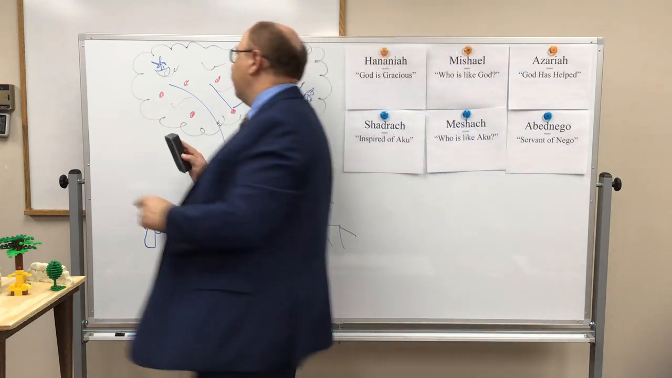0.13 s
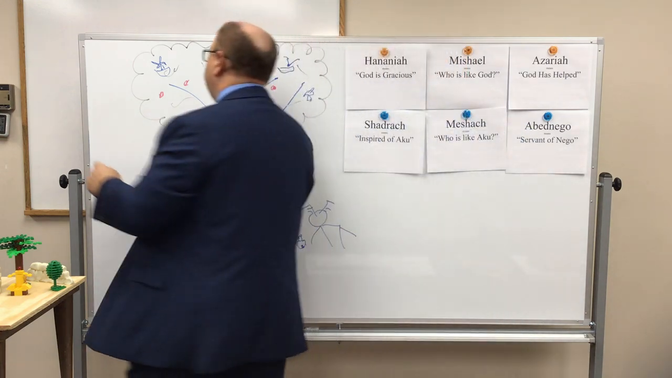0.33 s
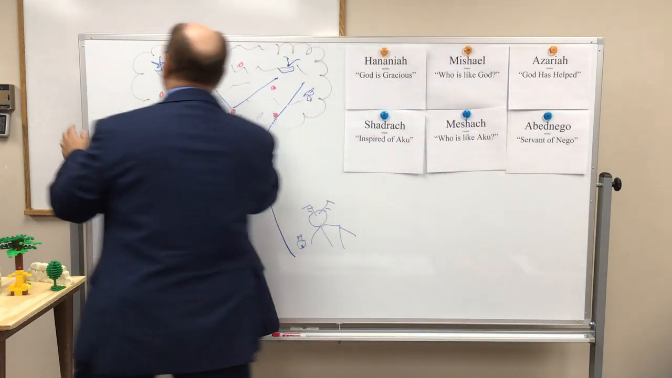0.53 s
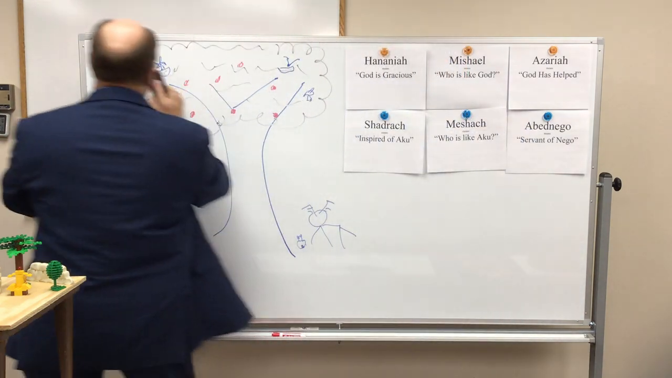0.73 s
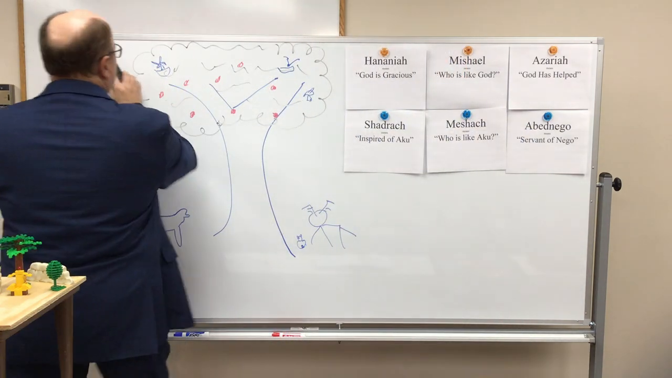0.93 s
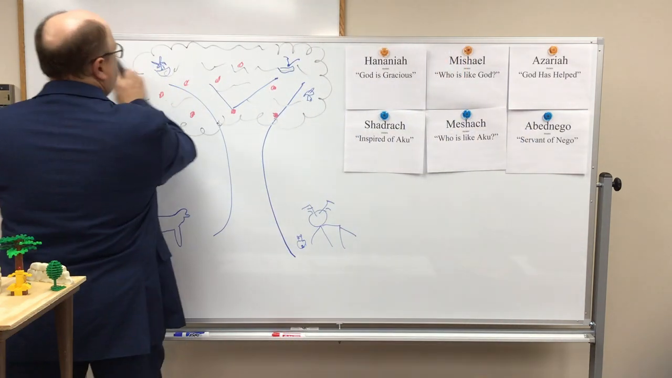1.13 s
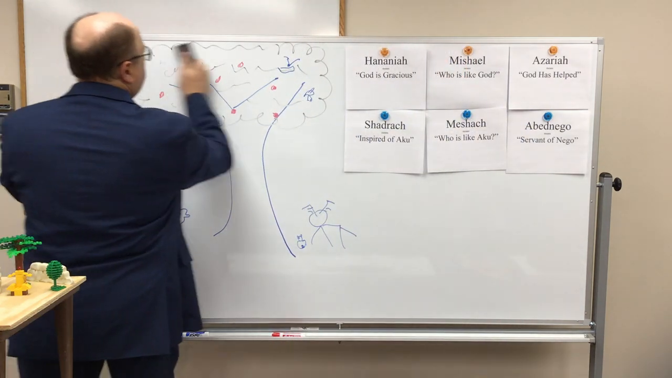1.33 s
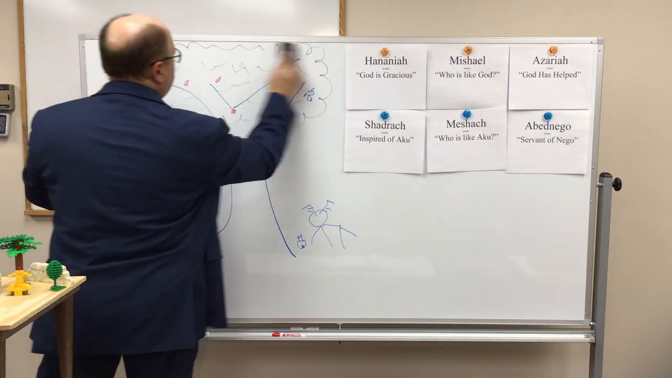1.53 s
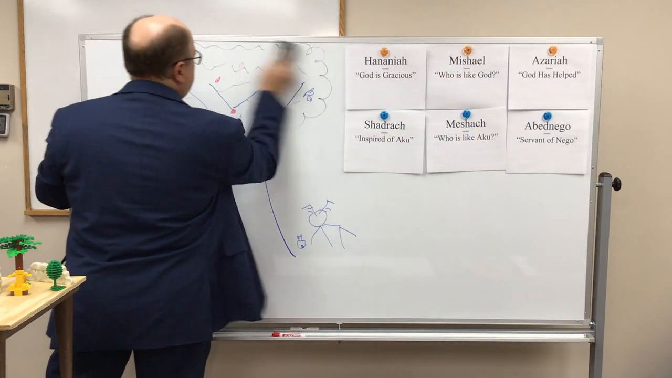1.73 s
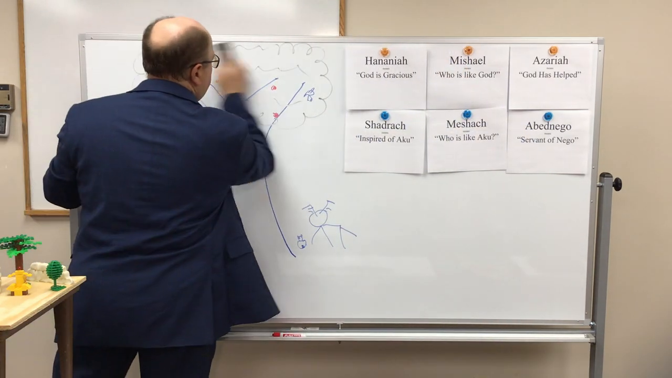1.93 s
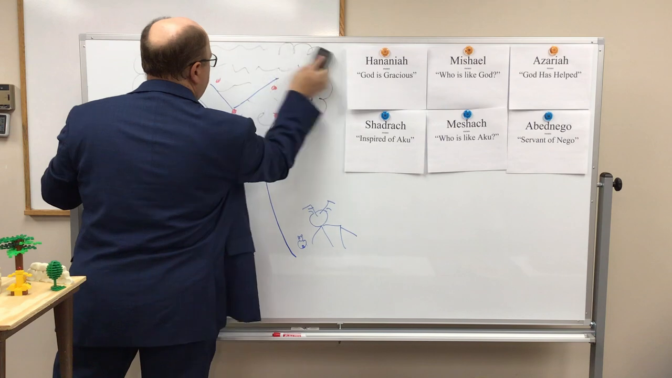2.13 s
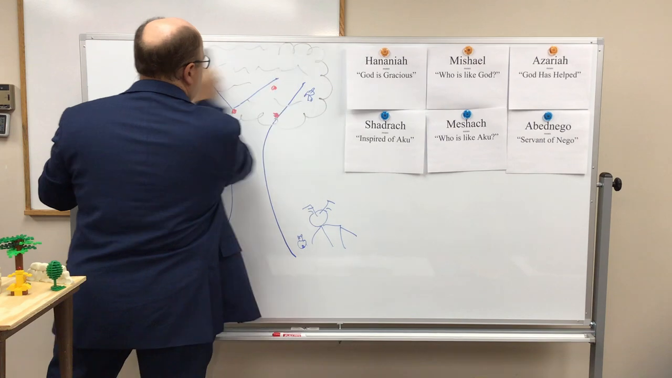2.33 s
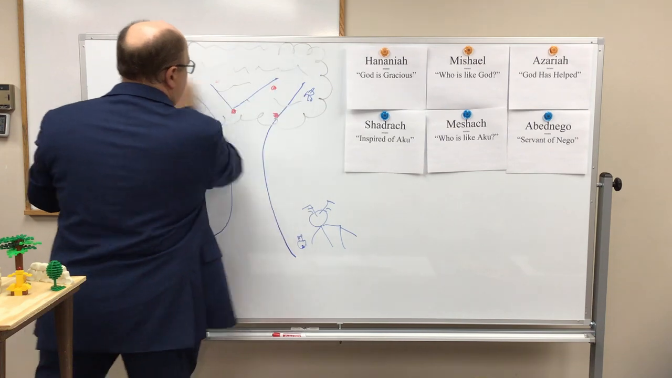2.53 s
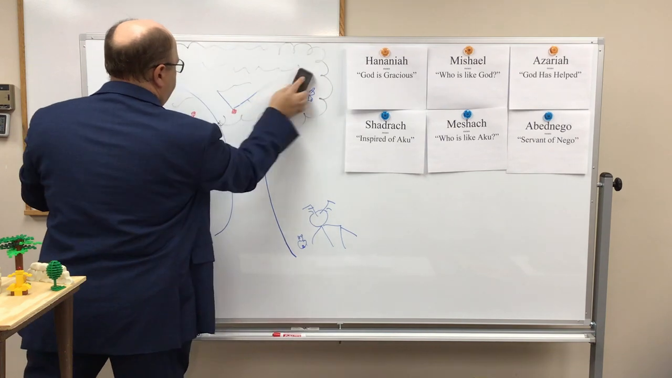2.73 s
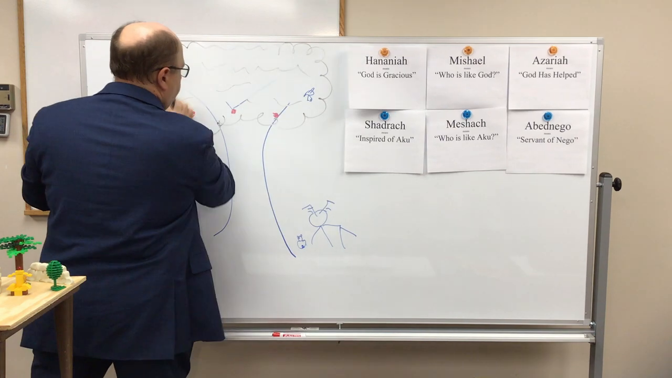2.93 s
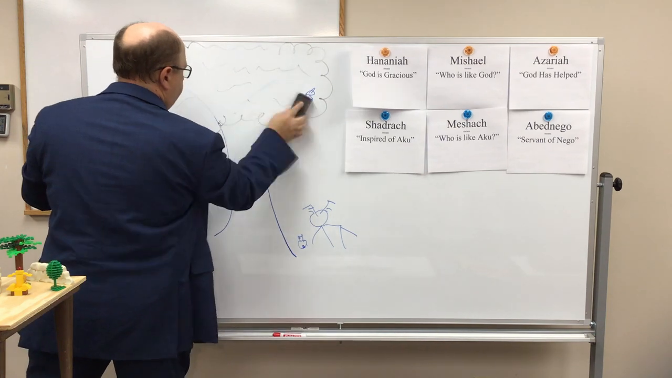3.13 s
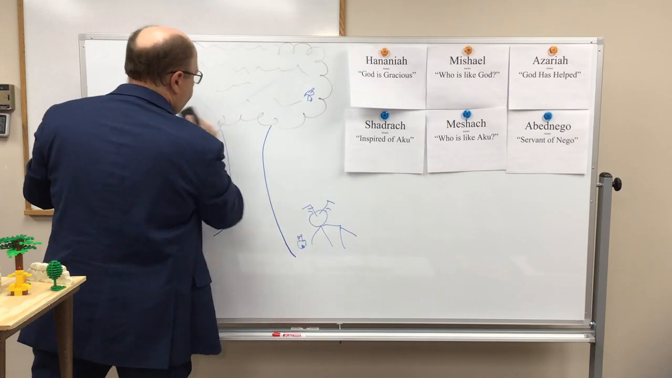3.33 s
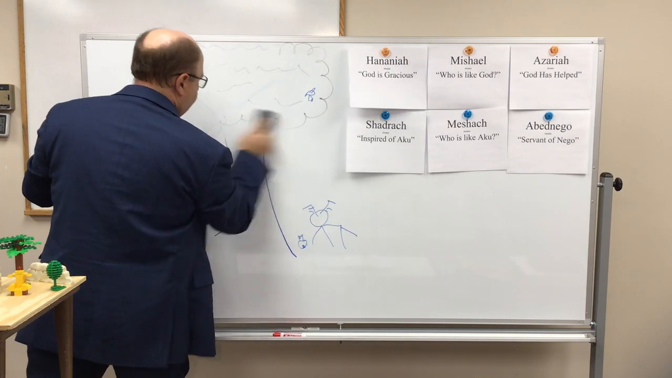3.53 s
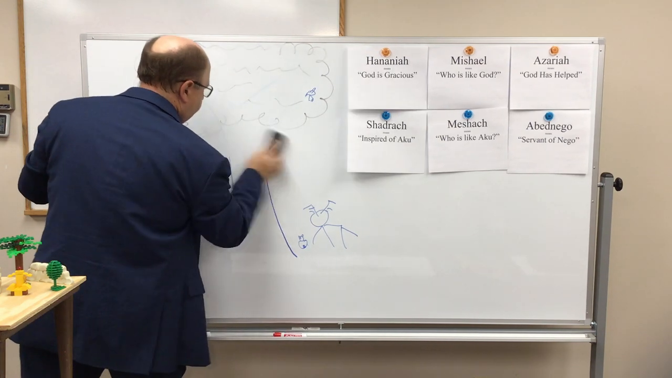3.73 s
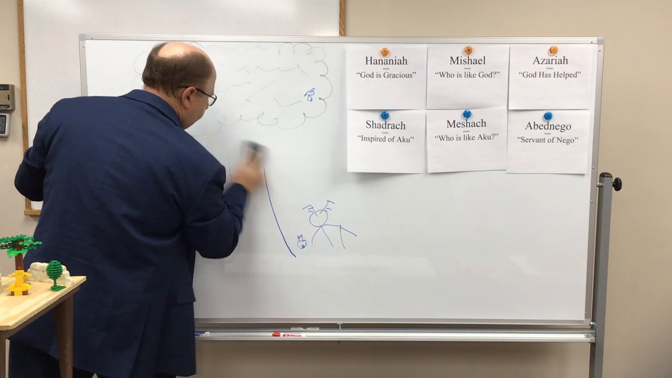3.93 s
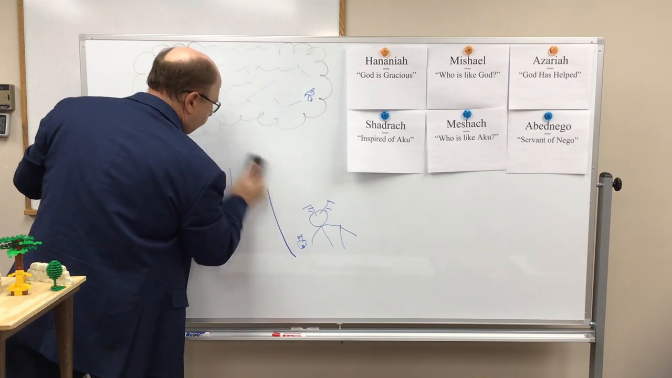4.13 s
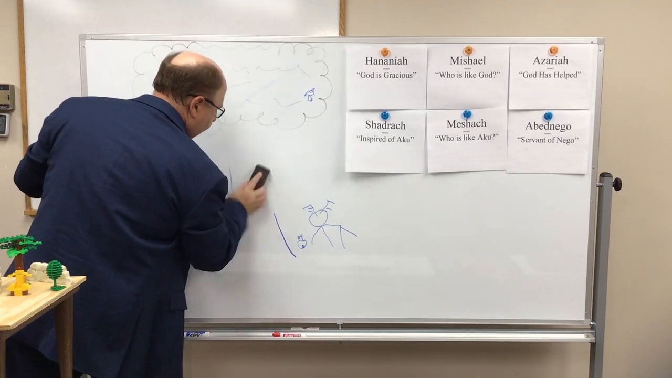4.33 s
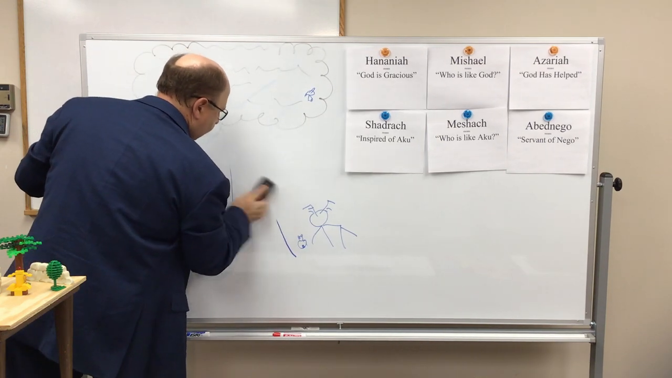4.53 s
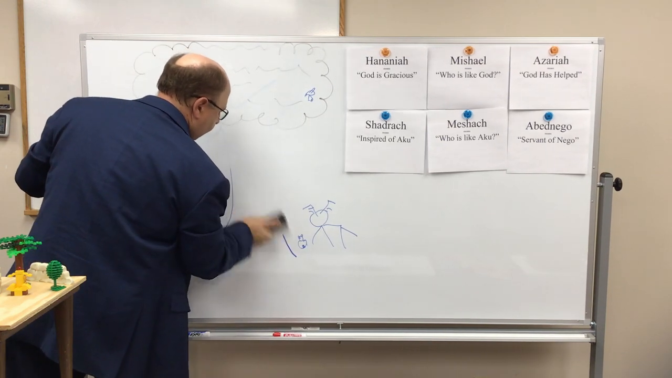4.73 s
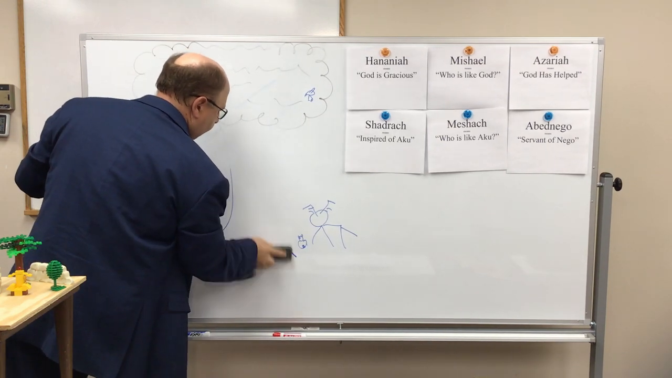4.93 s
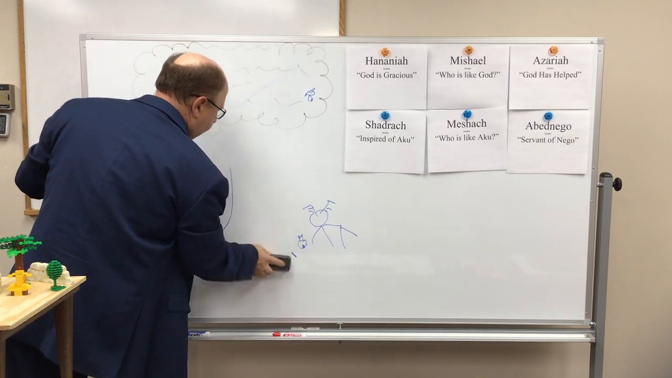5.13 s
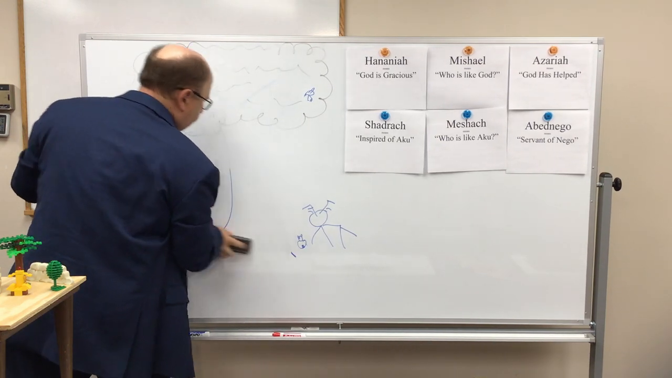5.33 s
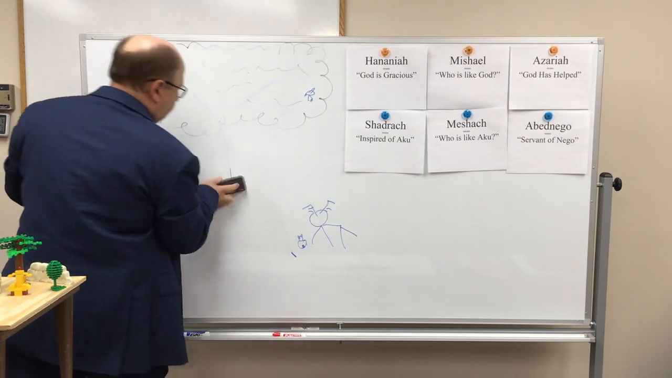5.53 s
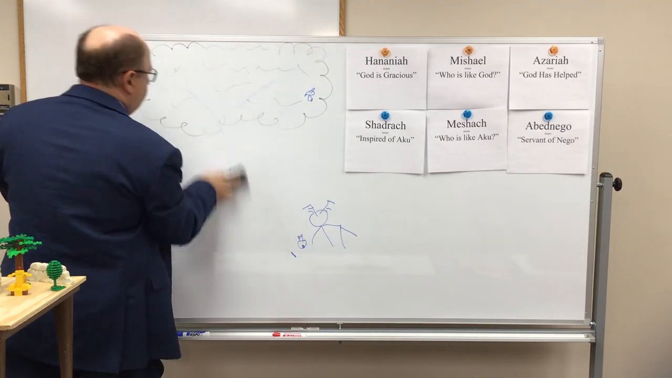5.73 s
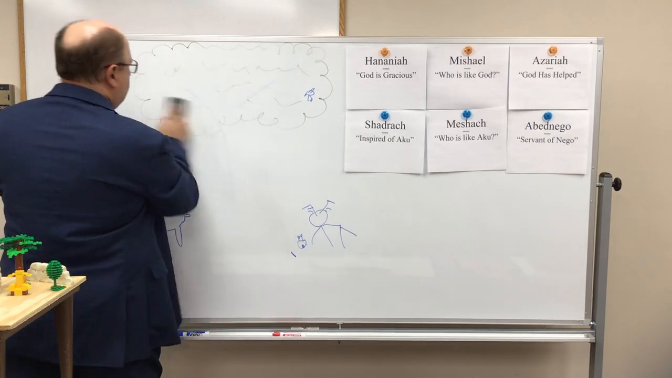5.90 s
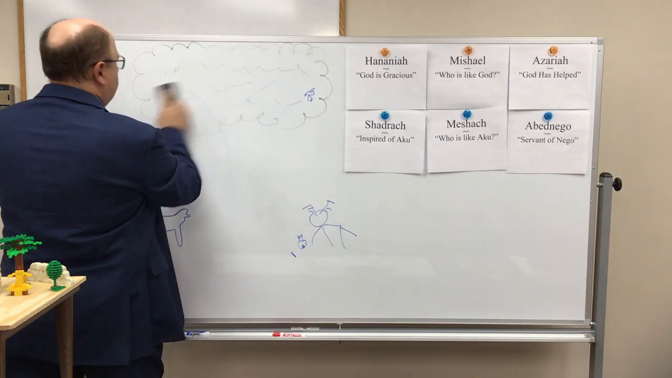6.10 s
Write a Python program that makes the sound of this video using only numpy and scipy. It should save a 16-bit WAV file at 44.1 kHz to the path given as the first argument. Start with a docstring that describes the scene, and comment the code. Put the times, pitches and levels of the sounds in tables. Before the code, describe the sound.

A jacket rustles and a hand knocks once against a whiteboard's frame. Then a felt eraser rubs back and forth in quick, uneven strokes, hissing and scraping while the panel gives hollow thumps and a low rumble. Plastic clacks and a few tiny squeaks break through. It is heard from a few metres away in a classroom with soft, steady ventilation.

```python
"""Erasing a whiteboard

A felt eraser scrubs a free-standing whiteboard in quick, uneven strokes, a few metres off in a classroom.
The felt hisses as it slides and drags on the panel, which thumps as the hand lands and turns;
hard contacts clack and squeak. First a jacket rustles and a hand grabs the frame.
The room answers over steady ventilation."""
import sys
import numpy as np
from scipy import signal
from scipy.fft import rfft, irfft, next_fast_len
from scipy.io import wavfile
from scipy.ndimage import uniform_filter1d, map_coordinates

SR = 44100
rng = np.random.default_rng(int(sys.argv[2]) if len(sys.argv) > 2 else 0)


def wrap_up_sound(samples):
    """Save the sound to the file named by the first command line argument, as 16-bit audio."""
    columns = np.atleast_2d(samples).T
    # keep every value between -1 and 1, then stretch to whole-number steps
    tamed = np.clip(columns, -1, 1)
    steps = np.round(tamed * 32767).astype(np.int16)
    wavfile.write(sys.argv[1], SR, steps)


N = 276242


def amp(db):
    """Decibels to gain."""
    return 10 ** (np.asarray(db) / 20)


def unit(x):
    """x at rms 1."""
    return x / np.sqrt(np.mean(x ** 2) + 1e-20)


def along(points, hz):
    """(Hz, value) points joined on a log frequency axis."""
    knots_hz, values = np.transpose(points)
    return np.interp(np.log(hz + 1), np.log(knots_hz + 1), values)


def wobble(rate):
    """A smooth random curve, rate knots a second."""
    knots = rng.standard_normal(int(N * rate / SR) + 4)
    return map_coordinates(knots, [np.arange(N) * rate / SR])


def filtered(x, response):
    """x through an EQ given as gain against Hz."""
    n = x.shape[-1]
    padded = next_fast_len(n + 8192)
    hz = np.fft.rfftfreq(padded, 1 / SR)
    return irfft(rfft(x, padded) * response(hz), padded)[..., :n]


def add(track, start_s, sound):
    """Mix a sound into the track at start_s."""
    start = max(round(start_s * SR), 0)
    part = track[..., start:start + sound.shape[-1]]
    part += sound[..., :part.shape[-1]]


# Stereo image of the room. Each row: frequency in Hz, left-right correlation.
STEREO_LIKENESS = [(100, .995), (300, .99), (600, .93), (2000, .95), (4000, .96), (7500, .82), (10500, .87),
                   (13000, .995)]
def diffuse(pair):
    """Blend two unrelated signals into a diffuse field, heard at two close points."""
    angle = lambda hz: np.arccos(np.clip(along(STEREO_LIKENESS, hz), -1, 1)) / 2
    mid, side = filtered(pair, lambda hz: np.array([np.cos(angle(hz)), np.sin(angle(hz))]))
    return np.array([mid + side, mid - side])


def noise(spectrum, grain=1):
    """Stereo noise of rms 1, roughened by a grain envelope, then coloured by (Hz, dB) points."""
    rough = grain * rng.standard_normal((2, N))
    return unit(diffuse(filtered(rough, lambda hz: amp(along(spectrum, hz)))))


# The classroom's reverb. Each row: frequency in Hz, time to fall 60 dB in seconds.
ROOM_DECAY = [(100, 0.44), (300, 0.27), (1000, 0.34), (4000, 0.24), (12000, 0.099)]
def room(x, predelay_s=.014):
    """The classroom answers from walls a few steps away; each frequency dies at its own speed."""
    hz, t, bands = signal.stft(rng.standard_normal((2, SR // 2)), SR, nperseg=256)
    decay = amp(-60 * t / along(ROOM_DECAY, hz)[:, None])
    tail = signal.istft(bands * decay, SR, nperseg=256)[1]
    tail = np.pad(diffuse(tail), ((0, 0), (round(predelay_s * SR), 0)))
    tail /= np.linalg.norm(tail[0])
    return signal.fftconvolve(np.atleast_2d(x), tail, axes=1)[:, :x.shape[-1]]


# Colour of the room tone. Each row: frequency in Hz, relative level in dB.
VENT_SPECTRUM = [(15, -55), (25, -16.5), (110, -2.5), (253, -6.5), (289, 0), (378, -12), (410, -7),
                 (482, -10.5), (919, -13.5), (1570, -13.5), (2230, -15), (3440, -17.5), (4040, -20),
                 (15500, -26.5)]
def ventilation():
    """Moving air lays a steady bed under the scene."""
    return amp(-61.0) * noise(VENT_SPECTRUM)


# Fader ride of the jacket on the way to the board. Each row: time in seconds, level in dB.
SLEEVE_LEVELS = [(0, -62), (.3, -64), (.45, -64.5), (.62, -60.5), (.8, -58.5), (.95, -62.5), (1.01, -57.5),
                 (1.13, -65), (1.2, -100)]
def sleeve():
    """Cloth brushes on cloth as the arm comes up."""
    times, levels = np.transpose(SLEEVE_LEVELS)
    level_db = np.interp(np.arange(N) / SR, times, levels)
    cloth = [(300, -22), (600, 3), (2200, -2), (5000, -2.5), (8000, -8), (15000, -17)]
    return amp(level_db - 2) * noise(cloth, grain=amp(1.8 * wobble(700)))


# The frame's ring. Each row: pitch in Hz, relative level in dB, time to fall 60 dB in seconds.
FRAME_MODES = [(166, 2, 0.15), (223, -2.5, 0.13), (322, 0.5, 0.086), (393, -14, 0.081), (505, -2.5, 0.099),
               (690, -12.5, 0.06), (1000, -19, .06)]
def grab(start_s=.630, level_db=-41.5, rise_s=0.00085):
    """The free hand takes hold of the board's edge and knocks the frame once."""
    out, t = np.zeros((2, N)), np.arange(SR // 2) / SR
    ring = sum(amp(db - 60 * t / t60) * np.sin(2 * np.pi * (hz * t + rng.random()))
               for hz, db, t60 in FRAME_MODES)
    knock = amp(level_db) * ring * (1 - np.exp(-t / rise_s))
    add(out, start_s, knock + amp(-7) * room(knock))
    return out


# Raspy chirps, and the bright snap on top of one late clack.
# Each row: start and length in seconds, level in dB, first and last pitch in Hz.
CHIRP_GLIDES = [(2.875, 0.019, -51, 2345, 1546), (3.266, 0.037, -53, 11000, 7000),
                (3.281, 0.043, -48.5, 7100, 5340), (3.298, 0.0253, -45.5, 2165, 1670),
                (3.626, 0.029, -50, 2360, 2140), (4.171, 0.014, -45, 1263, 1990),
                (4.177, 0.031, -44, 2390, 2004), (5.993, 0.0122, -47.5, 9500, 7540)]
def chirps(rasp=0.16):
    """Ragged glides: squeaks as the eraser's edge sticks and slips; the last is a clack's snap."""
    out = np.zeros(N)
    for start_s, length_s, db, first_hz, last_hz in CHIRP_GLIDES:
        progress = np.linspace(0, 1, round(length_s * SR))
        glide_hz = first_hz * (last_hz / first_hz) ** progress
        hz = glide_hz * (1 + rasp * wobble(1500)[:len(progress)])
        envelope = np.minimum(progress / 0.2, 1) * np.sqrt(1 - progress)
        add(out, start_s, amp(db + 1.5) * envelope * np.sin(2 * np.pi * np.cumsum(hz) / SR))
    return out + amp(-7) * room(out)


# Colour of a clack. Each row: frequency in Hz, relative level in dB.
SHELL_SPECTRUM = [(90, -30), (250, 5.5), (450, -4), (800, -3.5), (1400, -4.5), (2100, 0), (2900, -2.5),
                  (3500, -0.5), (3850, 0.5), (4400, -3), (5300, -10), (6100, -13.5), (9000, -27),
                  (16000, -43)]
# Hard contacts. Each row: start in seconds, level in dB, hollowness in dB, brightness in dB.
CLACK_HITS = [(0.776, -66, 2, 12.5), (1.787, -56, 5, -9), (2.262, -61, 11.5, -1), (2.478, -43, 2.5, 4.5),
              (2.879, -49, -8.5, -8), (3.293, -48.5, -8, -5), (3.452, -53.5, 5.5, 2),
              (3.475, -43, -6.5, -16), (3.787, -48, 1, 4), (3.914, -49.5, 1, -1.5), (4.066, -54, 0, 6),
              (4.289, -52, -12, 1.5), (4.396, -58, 1, 4.5), (4.519, -62, 4, -10), (4.629, -63.5, 6.5, -2),
              (5.566, -59, 3, -8), (5.913, -44.5, 5.5, 1.5), (5.934, -44, 9, -4.5), (5.993, -40.5, -4, -3),
              (6.029, -43.5, 4, -9.5), (6.163, -52.5, 6, 3)]
def clacks(t60_s=0.14, rise_s=0.003):
    """The plastic shell and the panel in its frame chatter: a dense burst of tiny contacts."""
    out, t = np.zeros((2, N)), np.arange(SR // 4) / SR
    for start_s, db, hollow_db, bright_db in CLACK_HITS:
        tint = [(900, hollow_db + 4.0), (2100, 0), (4200, bright_db - 0.5)]
        chatter = noise(SHELL_SPECTRUM, grain=amp(1.57 * wobble(281)))[:, :len(t)]
        burst = filtered(chatter, lambda hz: amp(along(tint, hz)))
        burst *= amp(db + 6.0 - 60 * t / t60_s) * (1 - np.exp(-t / rise_s))
        add(out, start_s, burst + amp(-7.0) * room(burst))
    return out


# The board's body. Each row: pitch in Hz, relative level in dB, time to fall 60 dB in seconds.
PANEL_MODES = [(98.3, 2.5, 0.35), (128.9, 0.5, 0.27), (144.1, 3.5, 0.23), (219, -8, 0.029),
               (245.5, 1.5, 0.12), (266.4, 1.5, 0.093), (286.2, 0, 0.1), (367.2, -8.5, 0.1),
               (385.5, -14, 0.11), (445.7, -7, 0.21), (496, -14.5, 0.16), (646, -20, 0.15),
               (755, -24, 0.51)]
def panel(force):
    """The panel's bending modes ring on under a force, at the force's own energy."""
    def response(hz):
        total = 0
        for k, (mode_hz, db, t60) in enumerate(PANEL_MODES):
            damping = 1j * hz * np.log(1000) / (np.pi * t60)
            total += (-1) ** k * amp(db) * damping / (mode_hz ** 2 - hz ** 2 + damping)
        return total
    return unit(filtered(force, response)) * np.std(force)


# The knock in a thump: harmonics 3 to 6 of the slip rate, in dB relative to harmonic 2.
OVERTONES_DB = [-14, -20.5, -31.5, -28.5]
# Landings and turns. Each row: start in seconds, level in dB, pitch in Hz, boom an octave down in dB.
THUMP_HITS = [(0.986, -45, 180, -24), (1.141, -48, 238.5, -1), (1.18, -48.5, 238, -4.5),
              (1.397, -45.5, 243, -15), (1.437, -33, 248.3, -3.5), (1.458, -40.5, 256, -15),
              (1.613, -44.5, 249.5, -0.5), (1.794, -33, 259, -6.5), (1.993, -40, 260, -3.5),
              (2.206, -41.5, 251, -2), (2.232, -37.5, 246.4, -1.5), (2.274, -42.5, 262, 0),
              (2.641, -39.5, 231, -10), (2.669, -41, 261, 3), (2.819, -45.5, 252, 6),
              (3.073, -31.5, 245, -6), (3.121, -39.5, 233, -1), (3.248, -31.5, 249.4, 1.5),
              (3.264, -36, 253, -2), (3.403, -34.5, 251, -8), (3.478, -25.5, 252.6, -14.5),
              (3.502, -39.5, 279, -12), (3.668, -28.5, 259, -6.5), (3.782, -35, 252.3, -7),
              (3.879, -32.5, 247, -18), (3.921, -32.5, 248, -10.5), (4.059, -47, 234, -1),
              (4.213, -49, 276, 8), (4.292, -39.5, 241, -4), (4.407, -40, 258, -13), (4.518, -39, 248, 2),
              (4.741, -40, 253, 1), (4.836, -46, 271, -1), (4.972, -43.5, 259, 1), (5.198, -39, 260, -3.5),
              (5.492, -39, 263.4, -5.5), (5.57, -34.5, 256, -13), (5.778, -42, 246, -16),
              (5.933, -25, 236, -3.5), (6.035, -24.5, 264.4, -9.5), (6.188, -34.5, 258, -3)]
def thumps(rise_s=0.0048, hold_s=0.025, scatter_db=2.23, jitter=0.037):
    """The felt catches and judders for a few stick-slip cycles; panel and room ring on faintly."""
    out, t = np.zeros((2, N)), np.arange(SR // 2) / SR
    push = (1 - np.exp(-(t / rise_s) ** 2)) * np.exp(-(t / hold_s) ** 3)
    orders = np.arange(1, 7)[:, None]
    for start_s, db, pitch_hz, boom_db in THUMP_HITS:
        slip_hz = pitch_hz / 2 * (1 + jitter * wobble(84.5)[:len(t)])
        cycles = np.cumsum(slip_hz) / SR
        order_db = np.array([boom_db, 0, *OVERTONES_DB])[:, None]
        gains = amp(order_db + scatter_db * rng.standard_normal(orders.shape))
        harmonics = gains * np.sin(2 * np.pi * (orders * cycles + rng.random(orders.shape)))
        judder = amp(db + 1.5) * push * harmonics.sum(axis=0)
        add(out, start_s, judder + amp(-12.0) * panel(judder) + amp(-10.0) * room(judder))
    return out


def rumble(drag_gain):
    """The felt grips and lets go unevenly, shaking the panel with a cushioned force."""
    cushioned = [(30, -26), (100, -2.0), (260, -2.5), (400, 0.5), (800, 2.5), (1500, -3)]
    force = noise(cushioned, grain=amp(5.13 * wobble(40)))
    return amp(4.0) * drag_gain * panel(force)


# Sweeps of the hand, each lasting until the next. Each row: start in seconds, hiss in dB,
# scrape in dB, drag in dB, share of speed kept through the opening turn from 0 to 1.
HAND_STROKES = [(0.97, -68, -64, -70.5, .6), (1.19, -68.5, -66.5, -65, .05),
                (1.32, -60.5, -58.5, -68, 0.45), (1.745, -58, -58, -55.5, 0.42),
                (1.98, -56.5, -58, -63, 0.3), (2.215, -54.5, -58.5, -62.5, 0.2),
                (2.575, -53.5, -55, -60.5, .03), (2.837, -57, -57.5, -65.5, 0.33),
                (3.057, -54, -52.5, -49.5, 0.25), (3.244, -56.5, -53.5, -48.5, 0.25),
                (3.425, -55.5, -53, -48.5, 0.28), (3.59, -58, -53, -52, 0.38),
                (3.71, -56.5, -54.5, -48.5, 0.54), (3.88, -59, -55, -50.5, 0.42),
                (4.105, -60, -61, -56.5, 0.46), (4.2, -59.5, -59.5, -52.5, 0.4),
                (4.335, -64, -62, -55.5, .15), (4.44, -60, -60, -57.5, 0.25),
                (4.555, -64.5, -65, -54.5, .15), (4.67, -60.2, -65, -56.5, 0.3),
                (4.805, -62.5, -64, -58, .2), (4.9, -62, -69, -61, 0.1), (5.03, -63, -71, -56.5, .1),
                (5.135, -63.5, -64.5, -60.5, 0.3), (5.26, -63, -63.5, -63, 0),
                (5.5, -63.5, -59.5, -59, 0.6), (5.635, -64.5, -59.5, -57.5, 0.6),
                (5.772, -54, -55.5, -55, 0), (6.115, -57.5, -55, -46.5, 0.08)]
def hand(end_s=6.32, blend_s=0.058, drag_ease_db=3):
    """Gains of hiss, scrape and drag as the hand speeds up, slides and slows into each turn."""
    starts, *levels, kept = np.transpose(HAND_STROKES)
    count = len(starts)
    place = np.interp(np.arange(N) / SR, np.append(starts, end_s), np.arange(count + 1))
    stroke, progress = np.minimum(place.astype(int), count - 1), place % 1
    hiss_db, scrape_db, drag_db = np.array(levels)[:, stroke]
    drag_db -= drag_ease_db * (progress - .5)  # the felt grips hardest early in a stroke
    turn_speed = np.interp(place, np.arange(count), np.clip(kept, 0, 1))
    swing = np.abs(np.sin(np.pi * progress)) ** 0.69  # quick turns, a long even middle
    speed = turn_speed + (1 - turn_speed) * swing
    blend = round(blend_s * SR)  # pressure crossfades from stroke to stroke
    blended_db = uniform_filter1d(np.array([hiss_db, scrape_db, drag_db]), blend)
    touching = uniform_filter1d(1.0 * (place > 0), blend)
    return touching * amp(blended_db) * np.array([speed, speed ** 0.62, speed ** 0.14])


# Colours of the felt's two layers. Each row: frequency in Hz, relative level in dB.
HISS_SPECTRUM = [(1500, -28), (3000, -1), (4300, 3), (6200, 0), (8000, 0.5), (11000, -1.5), (14000, -4),
                 (16000, -9)]
SCRAPE_SPECTRUM = [(300, -37), (600, -0.5), (900, -2), (1750, -4.5), (2200, 1), (3000, -1), (4200, -3),
                   (5500, -5.5), (8000, -41), (16000, -26)]
def felt(hiss_gain, scrape_gain, flutter_db=0.77):
    """Fibres slide over the gloss: speed makes a fine hiss, pressure a coarser scrape."""
    flutter = amp(flutter_db * wobble(45))
    hiss = amp(1.5) * hiss_gain * noise(HISS_SPECTRUM, grain=amp(1.1 * wobble(2500)))
    scrape = amp(-2.5) * scrape_gain * noise(SCRAPE_SPECTRUM, grain=amp(1.7 * wobble(700)))
    return flutter * (hiss + scrape)


def scene(low_cut_hz=72):
    """The eraser works a little to the right; a low cut takes the deep bass off thumps and rumble."""
    hiss_gain, scrape_gain, drag_gain = hand()
    low_cut = lambda hz: (1j * hz) ** 2 / (low_cut_hz ** 2 - hz ** 2 + 1j * hz * low_cut_hz)
    board = filtered(thumps() + rumble(drag_gain), low_cut)
    eraser = felt(hiss_gain, scrape_gain) + clacks() + chirps()
    pan = amp([[-.25], [.25]])
    return pan * eraser + board + grab() + sleeve() + ventilation()


def record(dry):
    """A brick-wall high cut takes the very top off the mix."""
    return filtered(dry, lambda hz: hz < 15750)


dry = scene()
out = record(dry)
wrap_up_sound(out)
```